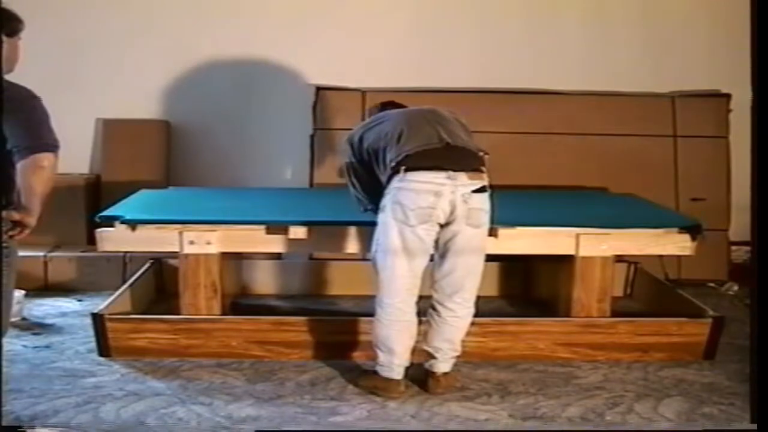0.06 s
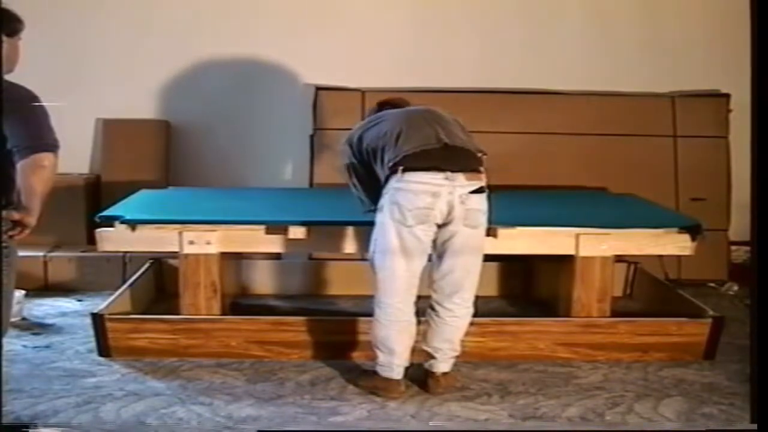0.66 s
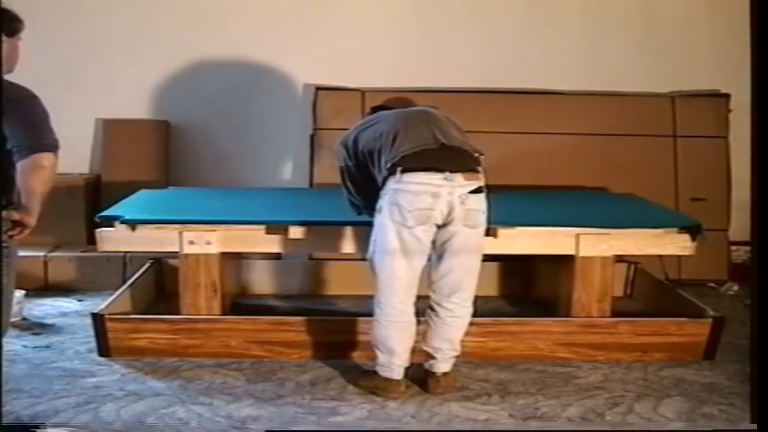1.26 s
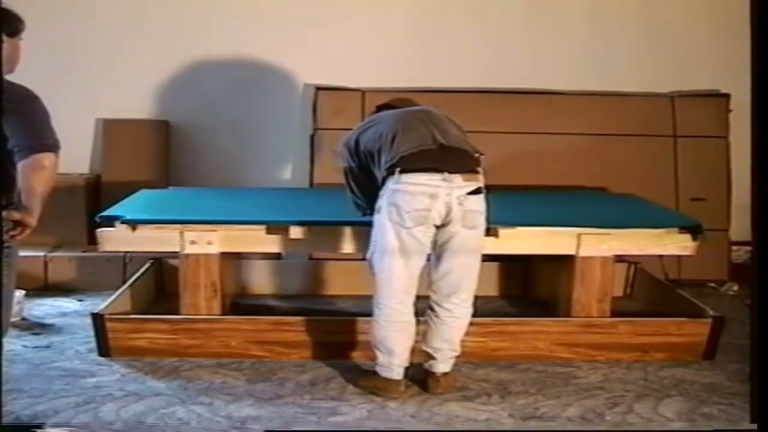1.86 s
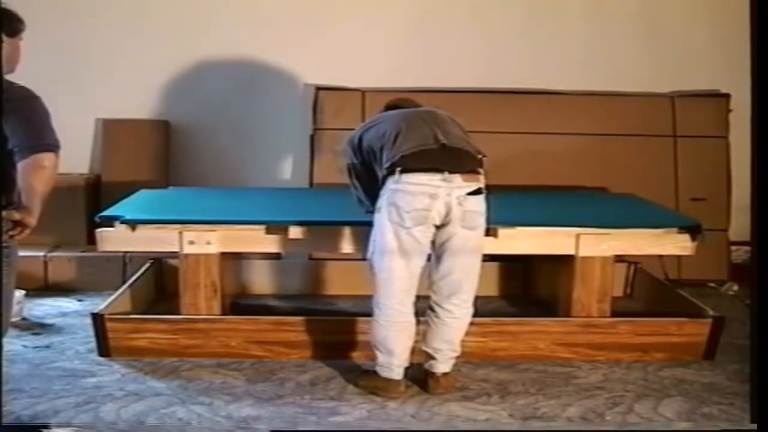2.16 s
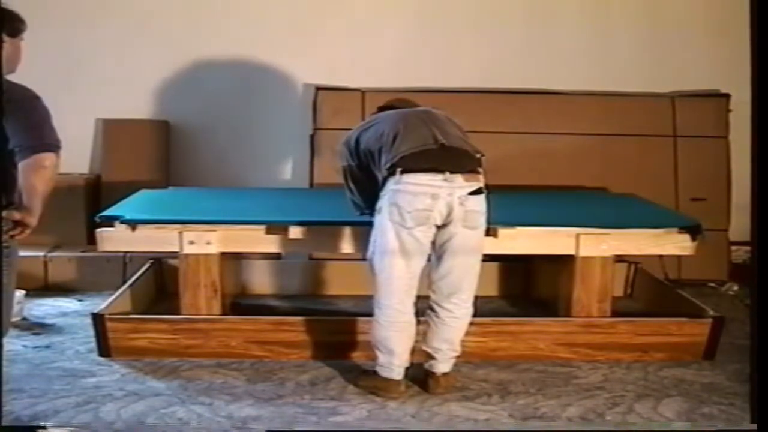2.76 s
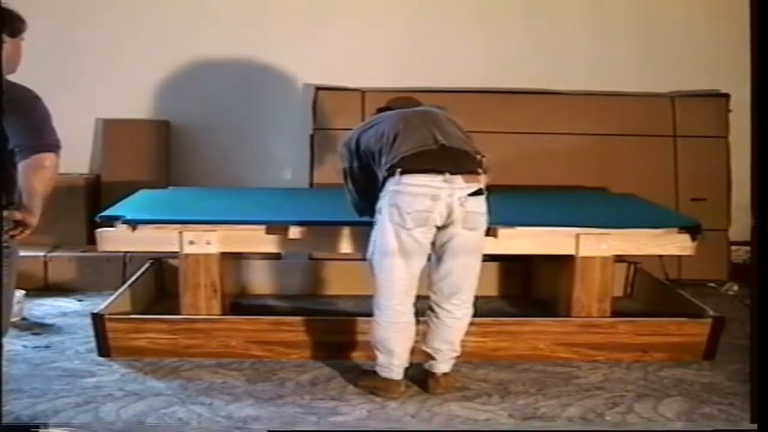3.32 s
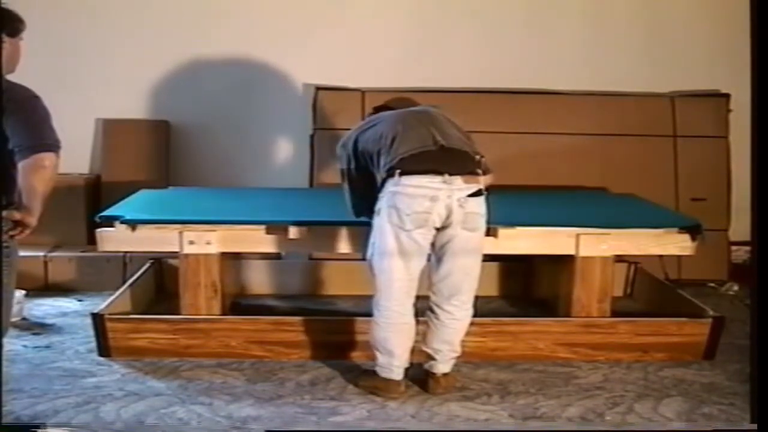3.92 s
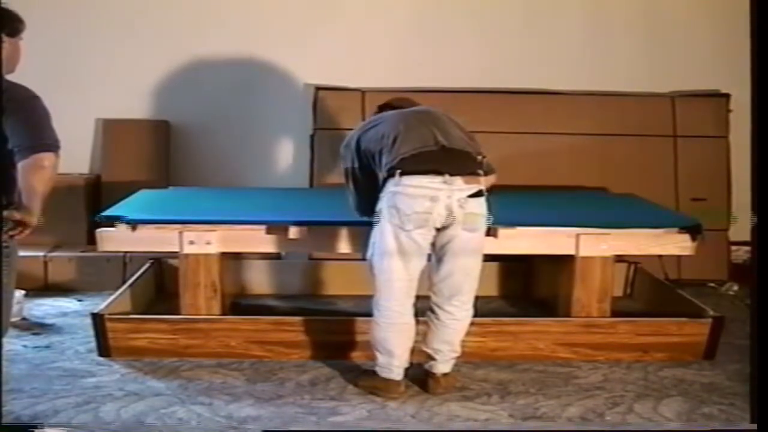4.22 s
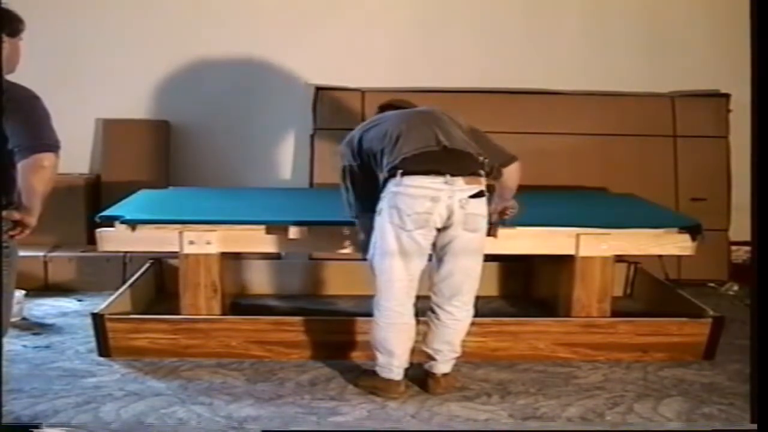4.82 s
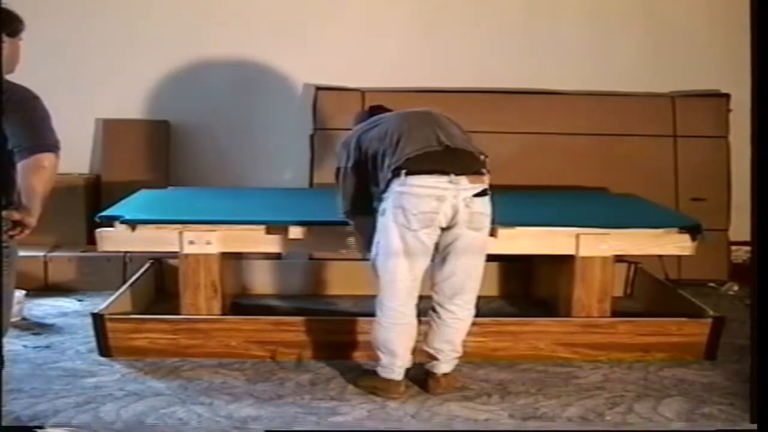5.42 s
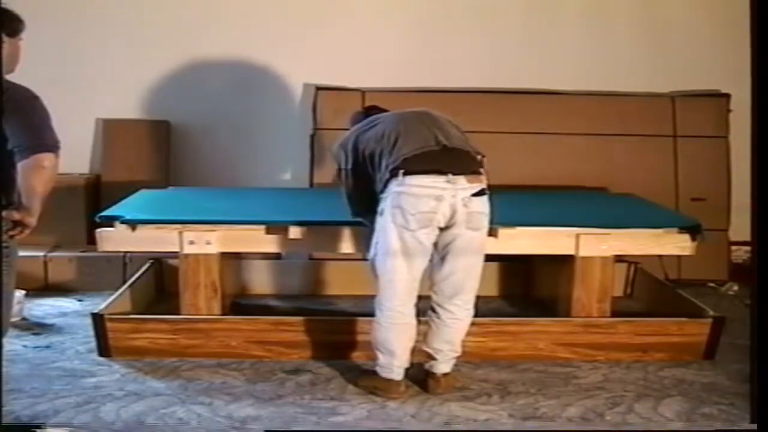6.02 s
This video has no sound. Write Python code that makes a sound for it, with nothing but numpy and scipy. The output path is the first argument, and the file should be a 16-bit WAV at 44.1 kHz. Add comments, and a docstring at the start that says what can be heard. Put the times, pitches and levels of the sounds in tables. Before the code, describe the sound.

A hand staple gun knocks dully against a pool table's wooden edge and fires three times at uneven intervals, each a sharp steel crack over a wooden thud, with lever clicks and clatter between. Cloth rustles softly. The gun is put down with a clink and a thump, then jangles as it is lifted. The microphone is a few metres away in a bare, echoing room, with rumble, hiss and a faint motor whine.

```python
"""A faint lever click and a few dull knocks: a hand staple gun is set against a pool table's wooden edge,
a few metres off in a bare, echoing room. It fires three times, each a crack of steel over the thud of
the frame, with a rattle of the lever. Soft rustles swell as cloth is pulled and as the last shot lingers.
The gun is put down with a clink and a thump and jangles as it is picked up. Underneath are room rumble,
tape hiss and the motor whine of a camcorder that ducks its gain under each shot."""
import sys
import numpy as np
from scipy import signal
from scipy.fft import rfft, irfft, next_fast_len
from scipy.io import wavfile
from scipy.ndimage import uniform_filter1d, map_coordinates

SR = 44100
rng = np.random.default_rng(int(sys.argv[2]) if len(sys.argv) > 2 else 0)


def output_pcm(signal):
    """Save a mono or channel-first signal as 16-bit PCM at the path in sys.argv[1].

    Samples are clipped to [-1, 1] before scaling.
    """
    pcm = np.clip(np.atleast_2d(signal).T, -1, 1) * 32767
    wavfile.write(sys.argv[1], SR, np.round(pcm).astype(np.int16))


N = 272534

# staples fired: (time of the blow [s], clack [dB], thud [dB], chatter t60 [s], lead of the spring's
# trip [s], trip [dB], recoil [dB], settling [dB], housing at the blow [dB], housing at the recoil [dB])
SHOTS = [(.719, -19, -26.5, 0.019, 0.0045, -23.5, -20.5, -30, -22.5, -25.5),
         (2.402, -16.5, -23.5, 0.016, 0.0036, -26.5, -19, -17.5, -30, -28.5),
         (3.499, -20.5, -15.5, 0.025, .033, -23, -19.5, -35, -20, -32)]
# tone of the frame under the striker's blow: (frequency [Hz], level [dB])
SLAM_EQ = [(60, -39), (170, -20.5), (260, -5), (340, -8.5), (470, 2), (620, 8.5), (900, -6), (1800, 5),
           (3000, -36), (11000, -47)]
# ring of the frame as a staple goes in: (frequency [Hz], width [Hz], level [dB])
SLAM_MODES = [(331, 14, 5), (470, 14, 6), (539, 12, -2), (696, 22, 2), (1085, 24, 1), (1130, 16, 3)]
# tone of the gun's nose hitting wood: (frequency [Hz], level [dB])
CLACK_EQ = [(60, -25), (170, -44), (270, -7.5), (450, 3.5), (720, 5), (1150, 6.5), (2000, 4), (2800, 1),
            (3600, -23.5), (6000, -7.5), (11000, -39)]
# ring of gun and frame together: (frequency [Hz], width [Hz], level [dB])
CLACK_MODES = [(331, 10, 5), (470, 9, 6), (539, 8, 2), (605, 8, -2), (668, 8, 1), (696, 9, 2),
               (724, 14, -9), (1078, 18, 2), (1130, 11, 5), (1178, 10, 0), (1370, 28, -2), (1535, 12, -5),
               (1597, 10, 1), (1694, 10, 0), (1769, 10, -7), (1868, 10, 1), (1966, 20, 8.5), (2012, 16, -3),
               (2397, 12, -3), (2861, 12, 3)]
# tone of the steel housing's rattle: (frequency [Hz], level [dB])
HOUSING_EQ = [(100, -2), (700, 3.5), (1100, 3.5), (2400, 8.5), (3300, 5.5), (4200, 10), (6000, 6),
              (7000, 6), (8200, 7.5), (9600, 4), (11000, -9)]
# ring of the housing: (frequency [Hz], width [Hz], level [dB])
HOUSING_MODES = [(1195, 25, 2), (2000, 40, 3), (4630, 110, -7), (4829, 60, -5), (5070, 80, -4),
                 (5450, 70, -6), (6120, 60, 2), (6510, 50, -5), (7660, 40, -3), (7920, 40, -2),
                 (8360, 50, -3)]
# hard cracks of striker, spring and lever within the shots: (time [s], level [dB])
SNAPS = [(0.721, -19), (0.733, -36), (0.746, -28), (2.4028, -24), (2.428, -29), (2.522, -40), (2.545, -31),
         (3.504, -22), (3.528, -30.5)]
# tone of a crack: (frequency [Hz], level [dB])
SNAP_EQ = [(200, 2), (1500, -8), (2800, 15), (3700, 11), (5200, 6), (6500, 2.5), (8300, 11.5), (9600, 8),
           (11000, 0.5)]
# low, ringless thumps at or just before each shot: (time [s], level [dB])
LOW_THUMPS = [(.72, -48), (2.401, -28), (3.438, -31)]

# the nose is set against the edge: (time [s], thud [dB], clack offset [dB], chatter t60 [s])
KNOCKS = [(0.565, -29, 0, 0.083), (.596, -33, 3, 0.081), (0.624, -38.5, 6, 0.044), (1.645, -30.5, -2, 0.17),
          (2.024, -41, 3.5, 0.088), (3.215, -53, 4, 0.054), (3.535, -26, -7, 0.045),
          (4.322, -41.5, 3, 0.15)]
# tone of the wooden edge: (frequency [Hz], level [dB])
EDGE_EQ = [(50, -51), (130, -12.5), (220, -0.5), (330, 3), (520, 0), (740, -2.5), (1100, -3.5), (1800, -13),
           (3000, -75), (11000, -52)]
# ring of the edge: (frequency [Hz], width [Hz], level [dB])
EDGE_MODES = [(269, 26, -4), (388, 36, -3), (462, 40, -2), (730, 70, -1), (791, 30, -4)]
# the lever is squeezed or let go: (time [s], level [dB])
LEVER_CLICKS = [(.36, -51.5), (0.676, -45), (1.345, -52), (1.558, -53), (1.69, -41.5), (1.712, -39.5),
                (1.763, -44), (2.113, -52.5), (2.521, -24.5), (3.049, -44), (3.430, -28), (3.442, -32.5),
                (3.834, -44), (5.408, -49)]
# the lever springs back against its stop: (time [s], level [dB], chatter t60 [s])
SPRING_BACK = [(2.891, -32, 0.088), (2.933, -28, 0.043), (2.957, -34, .04), (3.603, -27.5, 0.078)]
# tone of the lever's clatter: (frequency [Hz], level [dB])
LEVER_EQ = [(60, -31), (170, 2.5), (300, 3.5), (560, 3), (900, 3), (1400, 2), (2000, -2), (2900, -10),
            (3800, -3), (5500, -9), (8200, -8.5), (11000, -18.5)]
# ring of the lever: (frequency [Hz], width [Hz], level [dB])
LEVER_MODES = [(560, 40, -3), (1200, 28, 5)]

# the gun lands on the frame: (time [s], thud [dB], clink [dB], chatter t60 [s])
PUT_DOWN = [(4.759, -59, -35, 0.14), (4.794, -57, -32.5, 0.033), (4.807, -37.5, -28, 0.044),
            (4.819, -33.5, -30, 0.034), (4.831, -30.5, -34, 0.043), (4.872, -41, -49, 0.054)]
# tone of the frame under the gun's whole weight: (frequency [Hz], level [dB])
THUMP_EQ = [(50, -7), (150, -20), (240, 3.5), (330, 2), (480, -0.5), (620, 1), (800, -9), (1100, -5),
            (2000, -11), (11000, -42)]
# hollow ring of the frame: (frequency [Hz], width [Hz], level [dB])
THUMP_MODES = [(269, 24, 1), (385, 36, -8), (494, 24, 2)]
# tone of the base plate's clink: (frequency [Hz], level [dB])
PLATE_EQ = [(200, -38), (1100, -2), (2000, -4.5), (2600, 6.5), (4400, 2.5), (7000, 1), (9000, 2.5),
            (11000, -5)]
# ring of the base plate: (frequency [Hz], width [Hz], level [dB])
PLATE_MODES = [(2680, 200, -4), (4000, 90, -2), (4370, 150, 0), (5110, 70, 2), (6000, 90, 0),
               (6330, 90, -2), (7920, 110, 0), (8620, 52, 0)]
# loose steel parts collide as the gun is lifted: (time [s], level [dB], chatter t60 [s])
PICK_UP = [(4.978, -40, .04), (4.996, -28.5, 0.028), (5.007, -25.5, 0.082), (5.024, -24.5, 0.025),
           (5.039, -25.5, 0.039)]
# tone of their jangle: (frequency [Hz], level [dB])
JANGLE_EQ = [(100, 0.5), (700, -9), (1100, 0.5), (2400, 1.5), (3700, 0), (4400, 2.5), (6300, 0),
             (7000, 0.5), (8200, 1.5), (9600, -0.5), (11000, -9)]
# ring of the loose parts: (frequency [Hz], width [Hz], level [dB])
JANGLE_MODES = [(1195, 22, 4), (1470, 40, -3), (2010, 40, 4), (3050, 80, -5), (3420, 37, 2), (4600, 160, 0),
                (4829, 50, -2), (5090, 80, 0), (5500, 34, 1), (6110, 60, 1), (6220, 90, 2), (7660, 26, 0),
                (7920, 30, -1), (8370, 39, -1), (9640, 51, -3), (9830, 55, -3)]

# soft rustling swells: cloth pulls, and at 3.7 s the third shot's lingering reverberation:
# (time at full strength [s], hold [s], level [dB])
SWELLS = [(2.75, 0.28, -46.5), (3.7, 0.18, -44.5), (4.335, 0.21, -42.5), (4.67, 0.072, -38),
          (5.17, 0.15, -54.5)]
# tone of the rustle: (frequency [Hz], level [dB])
RUSTLE_EQ = [(40, -10), (150, 3), (450, 1), (800, -4.5), (2000, -2), (4000, -8.5), (8000, -10),
             (11000, -14.5)]
# reverb decay of the bare room: (frequency [Hz], t60 [s])
ROOM_T60 = [(100, 1), (300, 0.63), (700, 0.74), (1500, 0.66), (3000, 0.53), (6000, 0.56), (10000, 0.46)]
# bed of room rumble and tape hiss: (frequency [Hz], level [dB])
BED_EQ = [(12, -44), (22, -22), (45, -7), (90, -6.5), (170, -6), (350, -9.5), (550, -11), (780, -15.5),
          (1050, -21), (1600, -19), (2300, -23), (4000, -27), (7000, -27), (11000, -32.5)]
# stereo width of the bed: (frequency [Hz], side over mid [dB])
BED_WIDTH = [(60, 1), (110, 2), (190, 2), (340, 3), (610, 1), (1100, 5), (1960, 0), (3510, -1), (6280, -2),
             (11200, -2)]
# tones of the camcorder's motor: (frequency [Hz], level [dB])
WHINE = [(895, -68), (1010, -67), (1620, -65), (2159, -68), (2336, -73), (2519, -69), (3238, -75),
         (4856, -74), (6476, -75), (9711, -76)]


def shots():
    """The striker slams a staple into the frame and the gun recoils."""
    contacts = [row for shot in SHOTS for row in shot_contacts(*shot)]
    return gun(contacts, SLAM_EQ, SLAM_MODES,
               thud_db=-4, clack_db=-0.5, steel_db=2.5, pan_db=0.3, direct_db=17)


def shot_contacts(s, clack_db, thud_db, t60, lead, trip_db, recoil_db, settle_db,
                  steel_db, recoil_steel_db):
    """A shot's four hits: (time [s], thud [dB], clack [dB], steel [dB], chatter t60 [s])."""
    rebound_db = -11  # light rebounds move the frame less
    trip = (s - lead, trip_db + 1, trip_db, trip_db - 2.5, t60)  # the spring lets go
    blow = (s, thud_db, clack_db, steel_db, t60)
    recoil = (s + 0.027, recoil_db + rebound_db, recoil_db, recoil_steel_db, 0.64 * t60)  # jumps, lands
    settle = (s + 0.066, settle_db + rebound_db, settle_db, settle_db - 15, 0.063)  # rocks to rest
    return [trip, blow, recoil, settle]


def gun(contacts, wood_eq, wood_modes, thud_db, clack_db, steel_db, pan_db, direct_db):
    """Each hit has three layers: the wood's thud, the nose's clack and the steel housing's rattle."""
    wood, nose, steel = strikes(contacts, direct_db)
    thud = ringing(coloured(wood, wood_eq), wood_modes)
    clack = ringing(coloured(nose, CLACK_EQ), CLACK_MODES, ring_db=1.5)
    rattle = ringing(coloured(steel, HOUSING_EQ), HOUSING_MODES, ring_db=-8.5)  # damped by a firm grip
    return panned(amp(thud_db) * thud + amp(clack_db) * clack + amp(steel_db) * rattle, pan_db)


def snaps(t60=0.023):
    """Steel meets steel in short, hard, dense cracks that leave no ring."""
    drive, = strikes([(s, db, t60) for s, db in SNAPS], direct_db=30, spiky=0.5)
    return coloured(drive, SNAP_EQ)


def low_thumps(decay_s=0.013):
    """One low, ringless pulse at or just before each shot."""
    track = np.zeros((2, N))
    age = np.arange(SR // 8) / SR / decay_s
    pulse = np.tile(age * (2 - age) * np.exp(-age), (2, 1))
    for s, db in LOW_THUMPS:
        add(track, s, amp(db) * pulse)
    return track


def handling(click_t60=0.063):
    """The gun's nose knocks dully on the edge and its lever clicks."""
    knocks = [(s, db, db + hard_db, db + hard_db - 9.5, t60) for s, db, hard_db, t60 in KNOCKS]
    clicks = [(s, db - 18, db + 2.5, db, click_t60) for s, db in LEVER_CLICKS]
    return gun(knocks + clicks, EDGE_EQ, EDGE_MODES,
               thud_db=-0.5, clack_db=-8.5, steel_db=1.5, pan_db=0.37, direct_db=26)


def spring_back():
    """The released lever flies up and clatters against its stop."""
    drive, = strikes(SPRING_BACK, direct_db=21)
    return ringing(coloured(drive, LEVER_EQ), LEVER_MODES)


def put_down(thump_db=-4.5, clink_db=-3):
    """The base plate clinks, then the gun's weight thumps the hollow frame."""
    wood, steel = strikes(PUT_DOWN, direct_db=30)
    thump = ringing(coloured(wood, THUMP_EQ), THUMP_MODES, ring_db=2)
    clink = ringing(coloured(steel, PLATE_EQ), PLATE_MODES)
    return amp(thump_db) * thump + amp(clink_db) * clink


def pick_up(gain_db=-6):
    """Held loosely, the steel parts ring freely as they jangle."""
    drive, = strikes(PICK_UP, direct_db=28.5)
    jangle = ringing(coloured(drive, JANGLE_EQ), JANGLE_MODES, ring_db=1.5)
    return panned(amp(gain_db) * jangle, pan_db=0.7)


def strikes(events, direct_db, spiky=1.095):
    """Hits on the timeline: one stereo drive for each level column of the events."""
    drives = np.zeros((len(events[0]) - 2, 2, N))
    for s, *levels, t60 in events:
        for drive, db in zip(drives, levels):
            add(drive, s, amp(db) * contact(t60, direct_db, spiky))
    return drives


def contact(t60, direct_db, spiky, rise=0.25, flatten=0.033):
    """A burst of tiny uneven collisions builds and dies away, heard through the room."""
    t = np.arange(8192) / SR
    noise, strength = rng.standard_normal((2, len(t)))
    envelope = (1 - np.exp(-t / (rise * t60))) * amp(-60 * t / t60)  # longer chatter, softer attack
    spectrum = rfft(noise * np.exp(spiky * strength) * envelope, 2 * len(t))
    spectrum /= uniform_filter1d(np.abs(spectrum), 110) ** flatten  # evens the bands slightly
    burst = irfft(spectrum)[:len(t)]
    return signal.fftconvolve(room(direct_db), burst[None] / np.linalg.norm(burst), axes=1)


def rustles(grain_db=4, attack_s=0.14, release_t60=0.79):
    """Grainy noise builds, holds and fades: cloth slipping on wood, or the third shot's room tail."""
    t = np.arange(N) / SR
    swells = []
    for s, hold, db in SWELLS:
        attack = np.clip(1 + (t - s) / attack_s, 0, 1)
        release_db = 60 * np.maximum(t - s - hold, 0) / release_t60
        swells.append(attack * amp(db - release_db))
    grain = amp(grain_db * wander(t, rate_hz=60))
    noise = unit(rng.standard_normal(N) * grain) * np.max(swells, axis=0)
    reverb = room(direct_db=-3)
    rustle = signal.fftconvolve(noise[None], reverb / np.linalg.norm(reverb[0]), axes=1)[:, :N]
    return coloured(rustle, RUSTLE_EQ)


def room(direct_db, side_db=-2, build_s=0.00042):
    """The bare room's stereo impulse response: direct sound, then a tail whose treble dies first."""
    hz, t, bands = signal.stft(rng.standard_normal((2, SR)), SR, nperseg=256)
    decay = amp(-60 * t / along(ROOM_T60, hz)[:, None])
    mid, side = signal.istft(bands * decay, SR, nperseg=256)[1]
    side = side * amp(side_db)
    tail = np.array([mid + side, mid - side]) / np.sqrt(1 + amp(2 * side_db))
    tail *= 1 - np.exp(-np.arange(len(mid)) / SR / build_s)
    response = diffuse(tail)
    response[:, 0] += amp(direct_db)
    return response


def diffuse(tail, bins=150):
    """Many overlapping reflections favour no single pitch."""
    spectrum = rfft(tail, 2 * SR)
    power = np.mean(np.abs(spectrum) ** 2, axis=0)
    broad, narrow = uniform_filter1d(power, 20 * bins), uniform_filter1d(power, bins)
    return irfft(spectrum * np.sqrt(np.abs(broad / narrow)))[:, :SR]


def background(bed_db=-45, whine_db=-1):
    """A wide bed of room rumble and tape hiss, with the motor's whine on top."""
    def colour(hz):
        return amp(along(BED_EQ, hz)) * np.array([np.ones(len(hz)), amp(along(BED_WIDTH, hz))])
    mid, side = filtered(rng.standard_normal((2, N)), colour)
    bed = unit(np.array([mid + side, mid - side]))
    return panned(amp(bed_db) * bed + amp(whine_db) * motor(), pan_db=1)


def motor(waver_rad=0.61):
    """The camcorder's motor: unsteady tones reach each capsule through the case with their own phase."""
    t = np.arange(N) / SR
    whine = np.zeros((2, N))
    for hz, db in WHINE:
        phase = 2 * np.pi * (hz * t + rng.random((2, 1)) / 2)
        whine += amp(db) * np.sqrt(2) * np.sin(phase + waver_rad * wander(t, rate_hz=9))
    return whine


def gain_control(x, threshold_db=-14, release_db_per_s=60, attack_s=0.00058, window_s=0.0023):
    """Loud hits duck the gain fast; it climbs back at a steady rate."""
    def smooth(v, seconds):
        pole = np.exp(-1 / (seconds * SR))
        return signal.lfilter([1 - pole], [1, -pole], v)
    level_db = 10 * np.log10(smooth(np.mean(x ** 2, axis=0), window_s) + 1e-12)
    over_db = np.maximum(level_db - threshold_db, 0)
    ramp = release_db_per_s * np.arange(N) / SR
    cut_db = np.maximum.accumulate(over_db + ramp) - ramp
    return x * amp(-smooth(cut_db, attack_s))


def overload(x, ceiling=0.6, knee=5):
    """Peaks that outrun the gain control are soft-clipped."""
    return x / (1 + np.abs(x / ceiling) ** knee) ** (1 / knee)


def ringing(x, modes, ring_db=0):
    """Add a body's resonances to x; ring_db sets how far they stand out."""
    def response(hz):
        return 1 + sum(amp(db + ring_db) * 1j * hz * width / (centre ** 2 - hz ** 2 + 1j * hz * width)
                       for centre, width, db in modes)
    return filtered(x, response)


def coloured(x, eq, size=4096):
    """Shape x with an EQ curve, as a causal filter of unit energy."""
    cepstrum = irfft(np.log(amp(along(eq, np.fft.rfftfreq(size, 1 / SR)))))
    cepstrum[1:size // 2] *= 2  # minimum phase keeps attacks sharp
    cepstrum[size // 2 + 1:] = 0
    kernel = irfft(np.exp(rfft(cepstrum)))
    return signal.fftconvolve(x, kernel[None] / np.linalg.norm(kernel), axes=1)[:, :x.shape[1]]


def filtered(x, response):
    """Pass x through a complex frequency response."""
    size = x.shape[-1]
    padded = next_fast_len(size + SR // 2)
    return irfft(rfft(x, padded) * response(np.fft.rfftfreq(padded, 1 / SR)), padded)[..., :size]


def along(points, hz):
    """Read a curve on a log frequency axis."""
    freqs, values = np.transpose(points)
    return np.interp(np.log(hz + 1), np.log(freqs), values)


def wander(t, rate_hz):
    """Smooth random modulation."""
    return map_coordinates(rng.standard_normal(N // 100), [t * rate_hz])


def add(track, s, sound):
    """Mix a stereo sound in at time s."""
    part = track[:, round(s * SR):][:, :sound.shape[1]]
    part += sound[:, :part.shape[1]]


def panned(x, pan_db):
    """Left channel up and right channel down by pan_db."""
    return x * amp([[pan_db], [-pan_db]])


def amp(db):
    """Decibels to gain."""
    return 10 ** (np.asarray(db) / 20)


def unit(x):
    """Scale to rms 1."""
    return x / np.sqrt(np.mean(x ** 2) + 1e-20)


def scene():
    """The mix: shots in front, then handling, rustles and the background bed."""
    firing = shots() + snaps() + low_thumps()
    gun_moves = handling() + spring_back() + put_down() + pick_up()
    return firing + gun_moves + rustles() + background()


def record(dry, top_hz=10900):
    """The camcorder rides its gain, overloads briefly and cuts the top off steeply."""
    squashed = overload(gain_control(dry))
    return filtered(squashed, lambda hz: 1 / np.sqrt(1 + (hz / top_hz) ** 300))


dry = scene()
out = record(dry)
output_pcm(out)
```